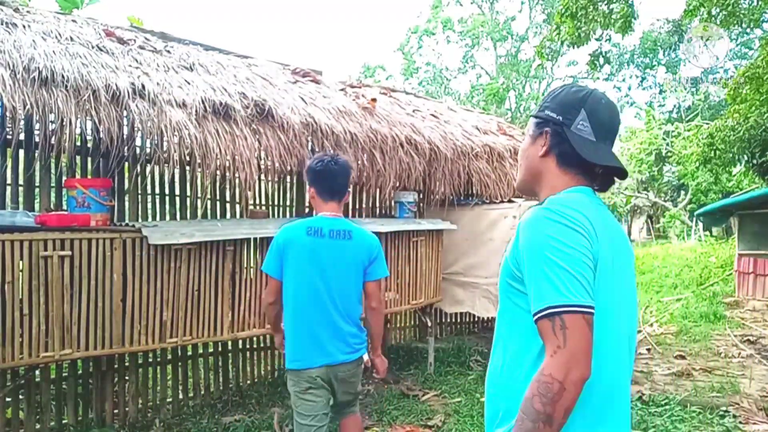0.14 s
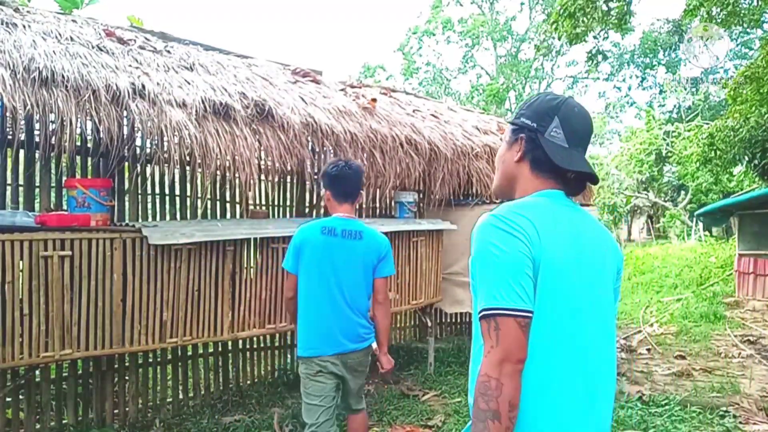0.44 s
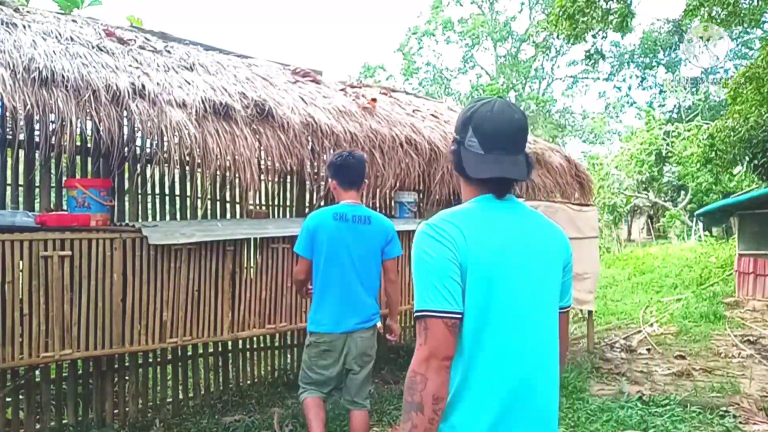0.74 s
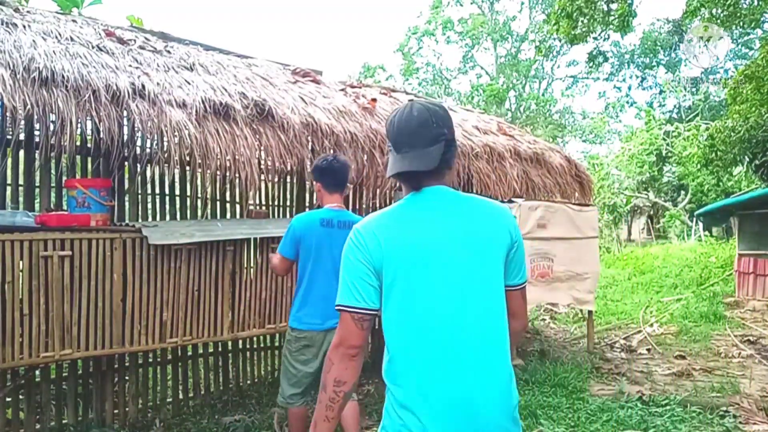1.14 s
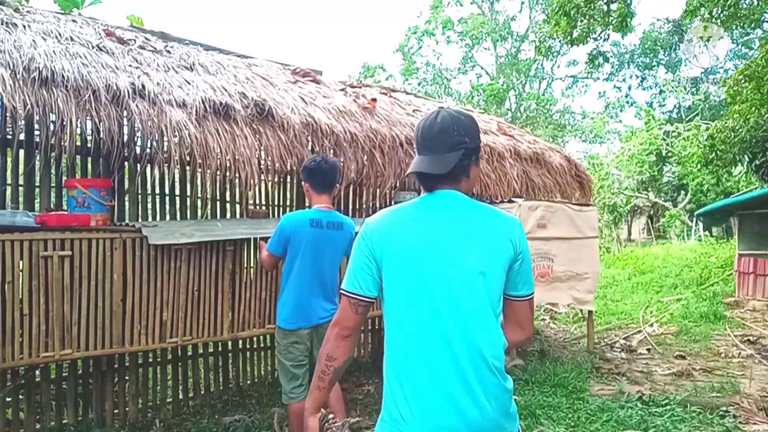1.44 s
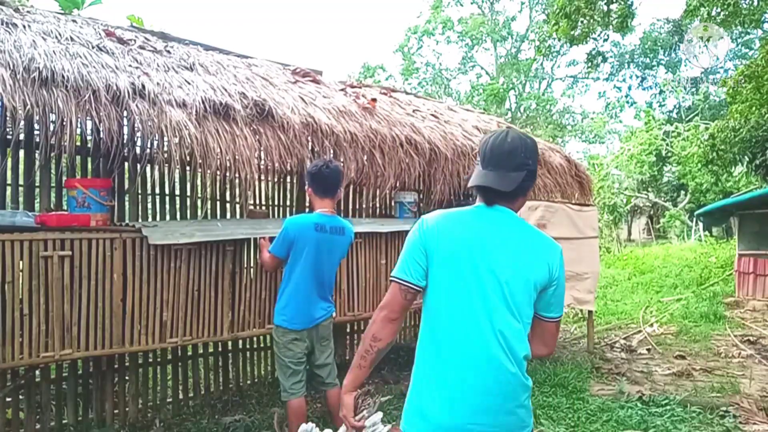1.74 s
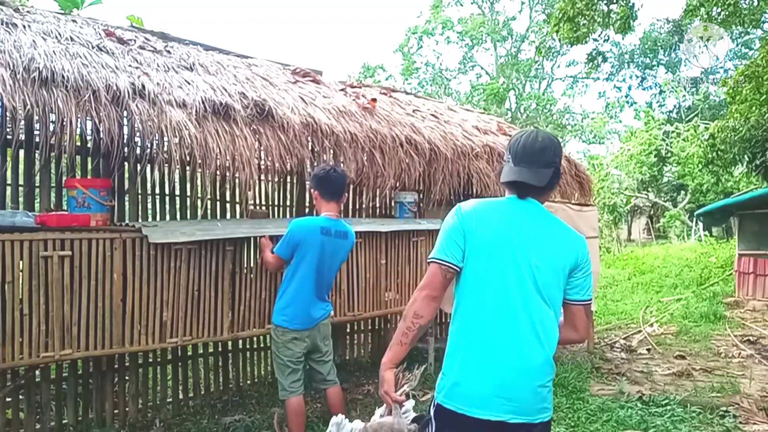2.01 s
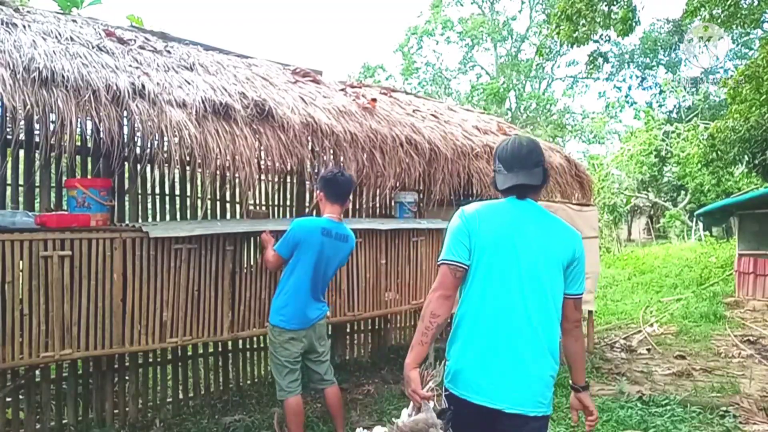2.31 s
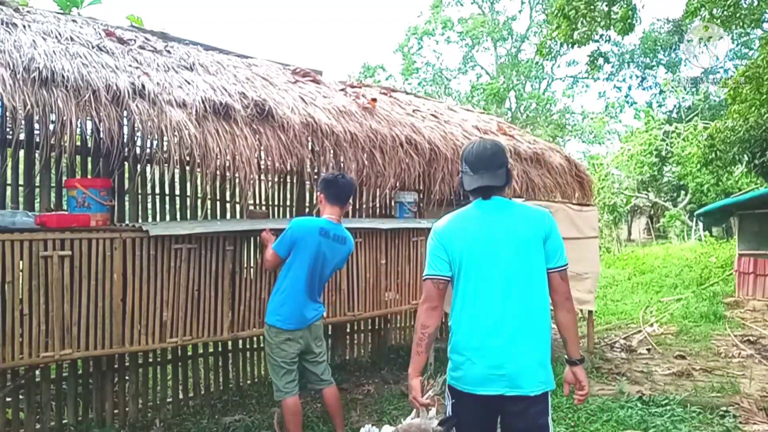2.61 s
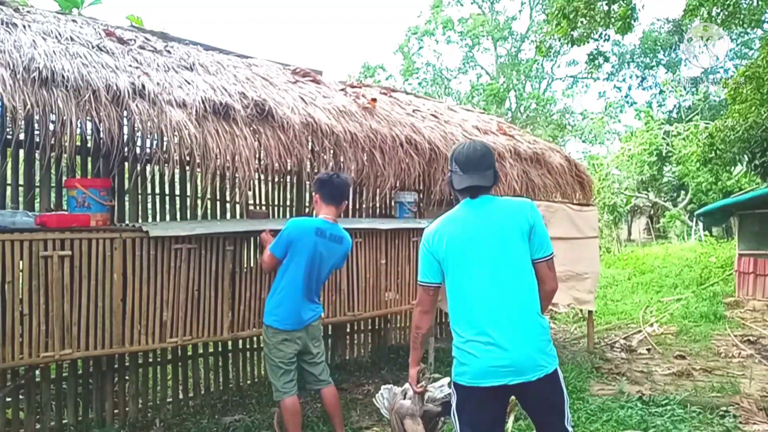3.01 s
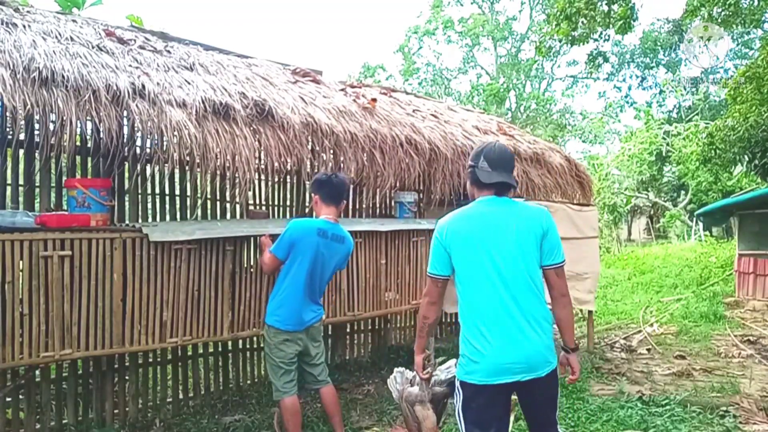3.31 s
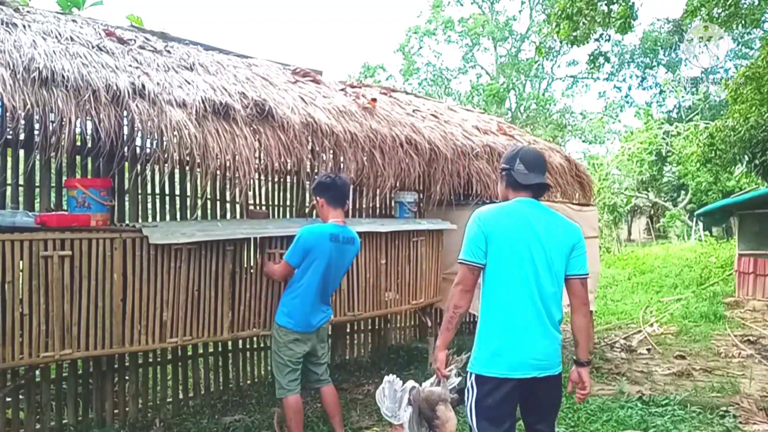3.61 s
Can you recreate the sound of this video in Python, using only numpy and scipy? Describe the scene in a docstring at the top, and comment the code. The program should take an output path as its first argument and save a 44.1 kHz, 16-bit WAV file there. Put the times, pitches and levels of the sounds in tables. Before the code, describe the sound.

A chicken chirps in quick, high two-note calls while hens cluck and a bamboo hatch rattles.

```python
"""A hen's soft low cluck and a brush of grass come first, over a thin outdoor hiss; low bumps reach the microphone.
Around a bamboo coop, hens cluck and whine on harmonics, chicks peep in falling glides,
and one bird chips about seven times a second on two falling notes. Faint chirps come from deep inside.
A bamboo hatch knocks on decaying resonances and rattles with noise; steps rustle as grains of noise.
The coop scatters the calls with echoes; the outdoor air is coloured noise. The picture is nearly mono."""
import sys
import numpy as np
from scipy import signal
from scipy.fft import rfft, irfft, next_fast_len
from scipy.io import wavfile
from scipy.ndimage import uniform_filter1d, map_coordinates

SR = 44100
rng = np.random.default_rng(int(sys.argv[2]) if len(sys.argv) > 2 else 0)


def wav_record(signal):
    """Record a signal, one row per channel, as 16-bit PCM in the file named by sys.argv[1]."""
    frames = np.transpose(np.atleast_2d(signal))
    bounded = np.clip(frames, -1, 1)
    # unit amplitude maps onto the largest positive 16-bit level
    quanta = np.round(bounded * 32767).astype(np.int16)
    wavfile.write(sys.argv[1], SR, quanta)


N = 165375  # samples, 3.75 s

# quick two-note chips: start_s, first_note_db, second_note_db
CHIPS = [(1.252, -36.5, -51), (1.343, -32.5, -38), (1.487, -26.5, -28.5), (1.629, -25.5, -27.5),
         (1.77, -20, -26.5), (1.910, -18.5, -33.5), (2.048, -24.5, -26.5), (2.186, -20, -25.5),
         (2.325, -23.5, -30.5), (2.474, -33.5, -30), (2.622, -32.5, -33.5), (2.813, -37, -66)]
# path of each note in a chip: after_start_s, pitch_hz, relative_level_db
FIRST_NOTE = [(0, 3830, -19), (.002, 3548, -7.5), (0.013, 3476, -2.5), (.015, 3187, -9.5),
              (0.016, 2926, -6), (.024, 2800, -16.5)]
SECOND_NOTE = [(0.047, 3080, -5), (0.051, 2682, -6.5), (.057, 2600, 5.5), (0.062, 2560, -38)]
# falling peeps of chicks: start_s, length_s, first_hz, middle_hz, last_hz, level_db
PEEPS = [(0.475, 0.099, 3780, 3570, 3510, -45), (.568, 0.049, 3403, 3240, 3110, -40),
         (0.771, 0.064, 4030, 3694, 3240, -38), (0.82, 0.052, 3400, 2935, 2460, -38),
         (1.531, 0.069, 4080, 3770, 3600, -39.5), (1.589, 0.081, 3700, 3400, 2567, -34.5),
         (2.232, 0.099, 4020, 3757, 3360, -41.5), (2.29, 0.0395, 3506, 3200, 2820, -37.5),
         (2.805, 0.058, 3520, 3476, 3485, -44), (3.349, 0.038, 3250, 3126, 2850, -38.5)]
# thin whines: start_s, length_s, first_hz, middle_hz, last_hz, level_db, octave_below_relative_db
WHINES = [(1.295, 0.14, 2345, 2185, 2073, -36, -18), (1.407, 0.18, 2138, 2127, 1970, -35.5, -44),
          (2.483, 0.061, 2138, 2127, 2140, -41.5, 0), (2.54, 0.1, 2137, 2098, 2124, -38.5, 3),
          (3.231, 0.083, 2114, 1956, 2040, -55, 11), (3.544, 0.038, 2300, 2180, 2210, -34, -16.5),
          (3.597, 0.025, 2010, 2052, 2000, -35, -19), (3.62, 0.048, 2017, 1930, 1840, -44.5, -5)]
# hens' clucks: start_s, length_s, first_hz, middle_hz, last_hz, level_db,
# roughness (share, clipped to 0-1), fundamental_boost_db, treble_db_per_octave (above 1200 Hz)
CLUCKS = [(0.04, 0.05, 621, 564, 500, -50, 0.3, 19, -18), (0.758, 0.038, 486, 463, 450, -49, .2, 3, -18),
          (0.917, 0.082, 775, 758, 790, -49, 0.1, 28, -3),
          (0.984, 0.044, 439, 435, 440, -37, 0.2, -3.5, -17),
          (1.121, 0.037, 638, 607, 540, -41.5, 0, 13.5, 0),
          (1.155, 0.044, 575, 544, 517, -42.5, .6, 16, -31),
          (1.192, 0.17, 536, 510, 389, -46, 0.23, 7, -27),
          (1.437, 0.047, 433, 405, 400, -39.5, 0.07, 0.5, -39),
          (1.617, 0.05, 461, 419.5, 412, -38, 0.48, 1, -3.5), (2.123, 0.041, 564, 582, 508, -33, 0, 5, -2),
          (2.199, 0.11, 353, 311.5, 293, -49.5, 0.46, 34, 0),
          (2.473, 0.043, 549, 564, 510, -35.5, 0.16, 12.5, -1.5),
          (2.56, 0.035, 398, 394, 380, -39.5, 0.18, 8, -9),
          (2.895, 0.047, 518, 576, 548, -33, 1.1, -20, -12),
          (2.937, .046, 593, 573.5, 486, -28.5, 0.1, 3.5, 1.5),
          (3.121, 0.0726, 418.4, 445, 494, -42, 0.44, -2.5, -2.5),
          (3.304, 0.1, 523.5, 522.5, 497, -41.5, 0.88, -10, -1),
          (3.39, 0.18, 429.5, 423.8, 419.4, -45.5, 0.52, -25, -12)]
# throat resonance of a hen: frequency_hz, level_db
THROAT = [(100, -36), (300, -13), (560, -11.5), (850, -5), (1170, 2.5), (1400, -4), (1750, -7.5),
          (2300, -16.5), (2900, -18.5), (3450, -17.5), (4200, -25.5), (8000, -27.5)]
# level of the chirps deep in the coop: time_s, level_db
CHATTER_LEVEL = [(1.2, -77), (1.26, -44.5), (1.36, -46), (1.46, -53), (1.55, -43), (1.68, -37), (1.75, -48),
                 (1.81, -42), (2.1, -37), (2.18, -45), (2.25, -39.5), (2.4, -36.5), (2.46, -48.5),
                 (2.5, -39), (2.85, -46), (3.0, -48), (3.15, -50), (3.25, -87)]
# hoarse hisses among the birds: start_s, length_s, centre_hz, level_db
RASPS = [(0.374, 0.1, 3780, -42.5), (0.831, 0.074, 3100, -41.5), (1.943, 0.14, 960, -43.5),
         (3.13, 0.066, 2250, -48.5), (3.303, 0.046, 1500, -42), (3.309, 0.16, 3230, -46.5),
         (3.3, 0.072, 4900, -49.5), (3.565, 0.082, 4900, -60.5)]
# blows of the hatch: start_s, level_db
KNOCKS = [(2.668, -30), (2.675, -36.5), (2.695, -34), (2.709, -34), (2.726, -35.5), (2.741, -36),
          (2.755, -39), (2.773, -37.5), (2.805, -45.5), (2.831, -43.5)]
# ringing modes of the bamboo: pitch_hz, level_db, t60_s
BAMBOO_MODES = [(147, -6, .3), (177, -7, .25), (259.5, 1.5, 0.15), (312.6, -5, 0.25), (417, 0.5, 0.17),
                (467, 0, 0.13), (521, 2, 0.14), (618, -2, 0.15), (665, -2, .2), (930, -8, 0.2),
                (1191, 0, 0.17), (1337, 0.5, 0.23), (1720, -12, 0.17)]
# colour of the slats' rattle: frequency_hz, level_db
CLATTER = [(50, -62), (85, -28), (135, 1), (260, -3.5), (460, -0.5), (825, -7.5), (1280, -2), (1500, -5.5),
           (2200, -10), (3400, -15), (4300, -27), (5400, -23.5), (6200, -28), (11000, -44)]
# brushes of grass and cloth: start_s, length_s, level_db
RUSTLES = [(0.107, 0.11, -42), (0.178, 0.16, -41), (0.624, 0.024, -56), (0.999, 0.018, -43),
           (1.90, 0.05, -43.5), (1.932, 0.088, -39), (2.017, 0.09, -42), (2.066, 0.12, -44),
           (2.35, 0.084, -42), (2.897, 0.036, -37.5), (2.926, 0.11, -44.5)]
# colour of the rustling: frequency_hz, level_db
RUSTLE_COLOUR = [(100, -60), (400, -24), (700, -18), (1200, 0.5), (1850, 5), (3500, 7), (4400, 1),
                 (5500, 5), (6200, -0.5), (7200, 6), (8500, -1), (10100, 0.5), (12000, -5), (13500, -8),
                 (15500, -3.5)]
# low bumps at the microphone: centre_s, level_db, pitch_hz, half_length_s
BUMPS = [(0.458, -36.5, 92, 0.018), (0.489, -33, 92, 0.0089), (0.597, -22, 113, .008),
         (.650, -27.5, 112, 0.0066), (0.674, -33, 96, 0.017), (.728, -34.5, 126, 0.0084),
         (.78, -49, 89, 0.014), (.835, -40, 110, 0.0079), (0.921, -36, 103, 0.0086),
         (3.403, -37, 90, 0.0048), (3.422, -26.5, 113, 0.006), (3.45, -42, 82, 0.034),
         (3.491, -39, 76.5, 0.024)]
# colour of the rumble around a bump: frequency_hz, level_db
BUMP_RUMBLE = [(25, -11), (60, -14.5), (110, 2), (200, 0.5), (400, -44), (1500, -78)]
# decay of the diffuse echo around the coop: frequency_hz, t60_s
YARD_DECAY = [(150, 0.16), (1000, 0.12), (3000, 0.49), (9000, 0.57)]
# colour of the outdoor air: frequency_hz, level_db
AIR = [(60, -40), (160, -8.5), (260, -8), (380, -6.5), (480, -3.5), (700, -7.5), (950, -6.5), (1130, -9),
       (1270, 7.5), (1450, -9), (2100, -6), (2400, -7.5), (2750, -9.5), (3500, -5), (4400, -13),
       (5400, -7.5), (6200, -22.5), (7000, -18.5), (8500, -19.5), (12000, -32)]
# course of the air, also followed by the narrow band: time_s, level_db
AIR_LEVEL = [(0, -56), (.06, -48.5), (.35, -50), (.55, -51.5), (.7, -50.5), (.8, -48.5), (1.0, -46),
             (1.09, -53), (1.16, -49), (1.5, -48), (1.62, -44), (1.85, -51.5), (2.0, -42.5), (2.25, -46.5),
             (2.45, -48.5), (2.8, -44), (3.06, -47), (3.22, -50), (3.35, -50), (3.5, -52), (3.64, -44),
             (3.72, -59.5)]
# colour of the thin high hiss: frequency_hz, level_db
HISS = [(5000, -51), (6200, -26), (7000, -3), (8200, -19.5), (9300, -5), (10300, 3.5), (11000, -4),
        (11800, -25.5), (15500, -23)]
# course of the hiss: time_s, level_db
HISS_LEVEL = [(0, -53), (.34, -51), (1.13, -52), (2.09, -50.5), (2.47, -52), (3.64, -52.5), (3.75, -60)]
# colour of the distant low hum: frequency_hz, level_db
HUM = [(20, -28), (45, -23), (75, -3.5), (105, 0.5), (160, -4.5), (260, -14), (600, -48), (2000, -80)]
# stereo width at the microphone: frequency_hz, side_below_mid_db
WIDTH = [(60, -38), (250, -20), (1000, -28), (2000, -44), (4000, -30), (8000, -53.5), (15000, -41)]

CLUCK_ATTACK, CLUCK_RELEASE = 0.33, 0.28  # shares of a cluck's length
CHIRPS_PER_S, CHIRP_S = 29, 0.043
CHIRP_LOWEST_START_HZ, CHIRP_HALF_SPREAD, CHIRP_FALL = 3354, 0.0503, 0.27  # last two: shares of pitch
RING_DB, CLATTER_DB, CLATTER_T60_S = -0.5, 2, 0.17
GRAIN_DB, FLUTTER_DB = 2.5, 2.5  # depth of the fast and the slower level changes in a rustle
DRONE_HZ, DRONE_WIDTH_HZ, DRONE_DB = 1265, 39, -57.5  # narrow background band, mean level in dB
HUM_DB = -58
PATCHY_DB = 4.5  # depth of the air's uneven patches in time and pitch
TOP_HZ = 15600  # upper limit of the recorder


def amp(db):
    """Decibels to amplitude."""
    return 10 ** (np.asarray(db) / 20)


def unit(x):
    """x scaled to rms 1."""
    return x / np.sqrt(np.mean(x ** 2) + 1e-20)


def along(points, hz):
    """Read (Hz, value) points on a logarithmic frequency axis."""
    f, v = np.transpose(points)
    return np.interp(np.log(hz + 1), np.log(f + 1), v)


def course(points):
    """Amplitude over the whole scene from (s, dB) points."""
    return amp(np.interp(np.arange(N) / SR, *np.transpose(points)))


def clock(length):
    """Sample times in seconds for one event."""
    return np.arange(int(length * SR)) / SR


def add(out, s, x):
    """Mix x in from time s."""
    i = max(0, round(s * SR))
    out[i:i + len(x)] += x[:max(0, N - i)]


def wobble(t, rate):
    """A smooth random curve, rate knots a second."""
    return map_coordinates(rng.standard_normal(4096), [t * rate], mode="wrap")


def filtered(x, response):
    """Shape x by a response of frequency, padded against wrap-around."""
    m = next_fast_len(x.shape[-1] + 8192)
    spectrum = rfft(x, m) * response(np.fft.rfftfreq(m, 1 / SR))
    return irfft(spectrum, m)[..., :x.shape[-1]]


def noise(colour, size=N):
    """Coloured noise of rms 1."""
    return unit(filtered(rng.standard_normal(size), lambda f: amp(along(colour, f))))


def band(hz, width_hz):
    """Noise of rms 1 in a steep-sided band, at half amplitude width_hz either side."""
    return unit(filtered(rng.standard_normal(N), lambda f: 1 / (1 + ((f - hz) / width_hz) ** 4)))


def swell(t, attack, release):
    """Attack, hold and release, as shares of the length."""
    u = t / t[-1]
    rise = np.sin(np.pi / 2 * np.clip(u / attack, 0, 1))
    fall = np.sin(np.pi / 2 * np.clip((1 - u) / release, 0, 1)) ** 2
    return rise * fall


def glide(t, pitches, jitter):
    """Pitch in Hz arching through three values, slightly unsteady."""
    arch = np.polyfit([0, .5, 1], pitches, 2)
    return np.polyval(arch, t / t[-1]) * (1 + jitter * wobble(t, 266))


def turns(hz):
    """Running phase in radians of a changing pitch."""
    return 2 * np.pi * np.cumsum(hz) / SR


def yard(x, wet_db, early_db):
    """A sound with eight echoes off the coop and a diffuse tail, drawn anew for each place."""
    hz, t, z = signal.stft(rng.standard_normal(SR // 2), SR, nperseg=256)
    decay = amp(-60 * t / along(YARD_DECAY, hz)[:, None])
    tail = signal.istft(z * decay, SR, nperseg=256)[1]
    tail *= np.clip(np.arange(len(tail)) / SR / 0.013, 0, 1) ** 2  # builds up over 13 ms
    answer = amp(wet_db) * tail / np.linalg.norm(tail)
    echoes = (rng.uniform(.004, .04, size=8) * SR).astype(int)
    answer[echoes] += amp(early_db) * rng.choice([-1, 1], size=8)
    answer[0] += 1  # the direct sound
    return signal.fftconvolve(x, answer)[:N]


def chips():
    """One bird: a pure tone plunges in pitch, then a shorter, lower one does."""
    out = np.zeros(N)
    for s, *levels in CHIPS:
        for note, db in zip((FIRST_NOTE, SECOND_NOTE), levels):
            when, hz, shape = np.transpose(note)
            t = clock(max(when[-1] - when[0], .005)) + when[0]
            phase = turns(np.interp(t, when, hz) * (1 + 0.0067 * wobble(t, 314)))
            level = amp(db + np.interp(t, when, shape) + 0.88 * wobble(t, 243))
            add(out, s + when[0], yard(level * np.sin(phase), wet_db=-8.5, early_db=-19))
    return out


def clucks():
    """Hens: harmonics through the throat, mixed with noise puffed once a cycle."""
    out = np.zeros(N)
    for s, length, *pitches, db, rough, low_db, treble_db in CLUCKS:
        t = clock(length)
        k = np.arange(1, 17)[:, None]  # harmonic numbers
        rough = np.clip(rough, 0, 1)
        hz = glide(t, pitches, jitter=0.0035 + 0.046 * rough)
        phase = turns(hz)

        def throat(f):
            return amp(along(THROAT, f) + treble_db * np.log2(np.maximum(f / 1200, 1)))

        harmonics = throat(k * hz) * amp(low_db * (k == 1)) * np.cos(k * phase)
        voice = unit(harmonics.sum(0))
        puffs = rng.standard_normal(len(t)) * (1 + np.cos(phase))
        hoarse = unit(filtered(puffs, throat))
        level = amp(db + 0.85 * wobble(t, 123)) * swell(t, CLUCK_ATTACK, CLUCK_RELEASE)
        call = level * unit((1 - rough) * voice + rough * hoarse)
        add(out, s, yard(call, wet_db=-13, early_db=-16))
    return out


def peeps():
    """Chicks: pure tones on a mostly falling glide, with a tremble in level."""
    out = np.zeros(N)
    for s, length, *pitches, db in PEEPS:
        t = clock(length)
        level = amp(db + 3.5 * wobble(t, 122)) * swell(t, attack=0.16, release=0.18)
        call = level * np.sin(turns(glide(t, pitches, jitter=.011)))
        add(out, s, yard(call, wet_db=-8, early_db=-17))
    return out


def whines():
    """Hens: thin calls of two harmonics, the given pitch and the octave below it."""
    out = np.zeros(N)
    for s, length, *pitches, db, low_db in WHINES:
        t = clock(length)
        phase = turns(glide(t, pitches, jitter=0.012))
        tone = amp(low_db) * np.sin(phase / 2) + np.sin(phase)
        level = amp(db + 0.81 * wobble(t, 62)) * swell(t, attack=0.27, release=0.2)
        add(out, s, yard(level * tone, wet_db=-8, early_db=-37.5))
    return out


def hatch():
    """The bamboo hatch: each blow rings decaying modes while loose slats rattle as noise."""
    out, t = np.zeros(N), clock(.5)
    for s, db in KNOCKS:
        ring = np.zeros(len(t))
        for hz, level, t60 in BAMBOO_MODES:
            decay = amp(level + rng.normal(0, 2.5) - 60 * t / t60)
            mode = np.sin(2 * np.pi * hz * rng.normal(1, 0.0064) * t)
            ring += decay * mode * rng.choice([-1, 1])
        ring /= ring[:SR // 50].std()  # level set by the first 20 ms
        clatter = noise(CLATTER, size=len(t)) * amp(-60 * t / CLATTER_T60_S)
        onset = 1 - np.exp(-t / 0.0018)
        add(out, s, amp(db) * (amp(RING_DB) * ring + amp(CLATTER_DB) * clatter) * onset)
    return yard(out, wet_db=-4.5, early_db=-20)


def bumps():
    """Soft pushes at the microphone: a brief low sine with a little rumble around it."""
    out, t = np.zeros(N), np.arange(N) / SR
    rumble = noise(BUMP_RUMBLE)
    for s, db, hz, half in BUMPS:
        u = (t - s) / half
        push = -np.sin(2 * np.pi * hz * (t - s)) * np.exp(-u * u)
        out += amp(db) * (push + amp(-14.5) * rumble * np.exp(-abs(u) / 2))
    return out


def rustles():
    """Brushing grass and cloth: clumps of fine bright grains of noise."""
    level = np.zeros(N)
    for s, length, db in RUSTLES:
        t = clock(length)
        add(level, s, amp(db) * swell(t, attack=0.21, release=0.47))
    t = np.arange(N) / SR
    unevenness = amp(GRAIN_DB * wobble(t, 900) + FLUTTER_DB * wobble(t, 70))
    grains = rng.standard_normal(N) * unevenness
    return level * unit(filtered(grains, lambda f: amp(along(RUSTLE_COLOUR, f))))


def rasps():
    """Brief toneless hisses from among the birds: swelling bands of noise."""
    out = np.zeros(N)
    for s, length, hz, db in RASPS:
        t = clock(length)
        hiss = band(hz, 0.24 * hz)[:len(t)]
        add(out, s, amp(db) * swell(t, attack=0.27, release=0.49) * hiss)
    return out


def chatter():
    """Chicks deep inside the coop: many faint falling chirps, heard largely as echo."""
    out, t = np.zeros(N), clock(CHIRP_S)
    for when, pitch, size in rng.uniform(size=(int(CHIRPS_PER_S * N / SR), 3)):
        start_hz = CHIRP_LOWEST_START_HZ * (1 + CHIRP_HALF_SPREAD * 2 * pitch)
        hz = start_hz * (1 - CHIRP_FALL * t / t[-1])
        chirp = swell(t, attack=0.082, release=0.05) * np.sin(turns(hz))
        add(out, when * N / SR, (.5 + size) * chirp)
    return unit(yard(out, wet_db=-1, early_db=-9)) * course(CHATTER_LEVEL)


def background():
    """Patchy outdoor air, a narrow middle band, a distant low hum and a thin high hiss, all noise."""
    t = np.arange(N) / SR
    air_db = np.interp(t, *np.transpose(AIR_LEVEL))
    z = signal.stft(noise(AIR), nperseg=512)[2]
    patches = uniform_filter1d(rng.standard_normal(z.shape), size=3, axis=0)  # smooth over pitch
    patches = unit(uniform_filter1d(patches, size=9, axis=1))  # smooth over time
    patchy = unit(signal.istft(z * amp(PATCHY_DB * patches), nperseg=512)[1][:N])
    air = amp(air_db + 1.57 * wobble(t, 10)) * patchy
    drone_db = DRONE_DB + air_db - air_db.mean() + wobble(t, 10)
    drone = amp(drone_db) * band(DRONE_HZ, DRONE_WIDTH_HZ)
    hum = amp(HUM_DB) * noise(HUM)
    hiss = course(HISS_LEVEL) * noise(HISS)
    return air + drone + hum + hiss


def scene():
    """Sum every source, then spread a faint scattered copy to the sides."""
    birds = chips() + clucks() + peeps() + whines() + rasps() + chatter()
    mid = birds + hatch() + bumps() + rustles() + background()
    scatter = rng.standard_normal(SR // 100)  # 10 ms of noise
    scattered = signal.fftconvolve(mid, scatter / np.linalg.norm(scatter))[:N]
    side = filtered(scattered, lambda f: amp(along(WIDTH, f)))
    return np.array([mid + side, mid - side])


def record(dry):
    """The recorder keeps nothing above its band limit."""
    return filtered(dry, lambda hz: hz < TOP_HZ)


dry = scene()
out = record(dry)
wav_record(out)
```